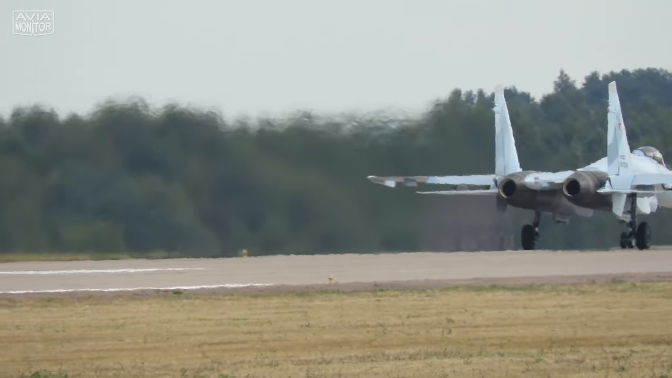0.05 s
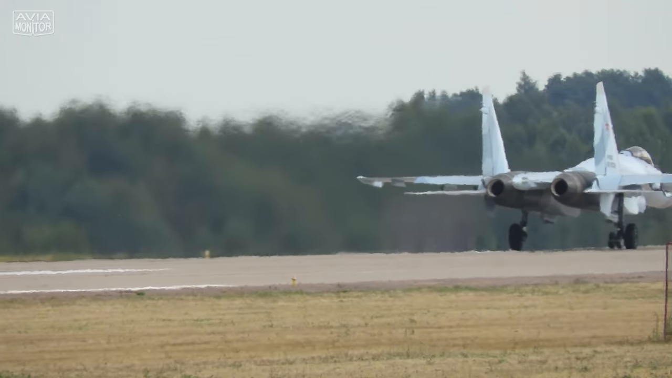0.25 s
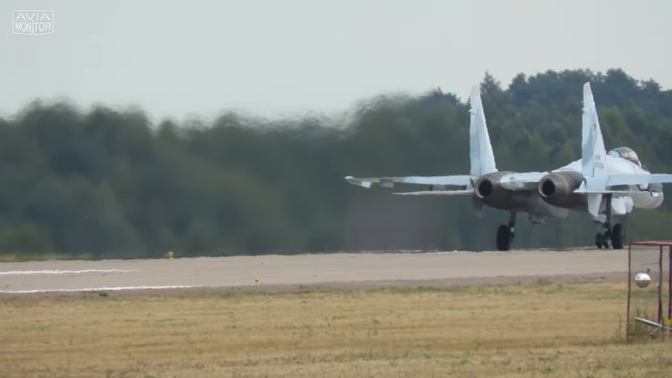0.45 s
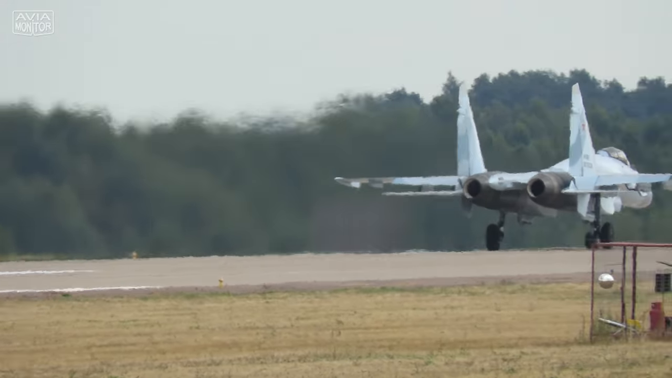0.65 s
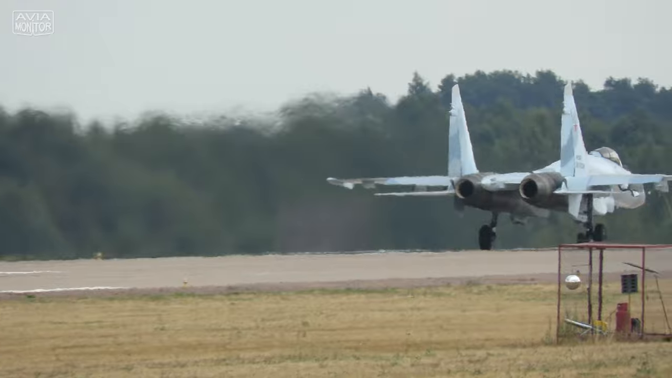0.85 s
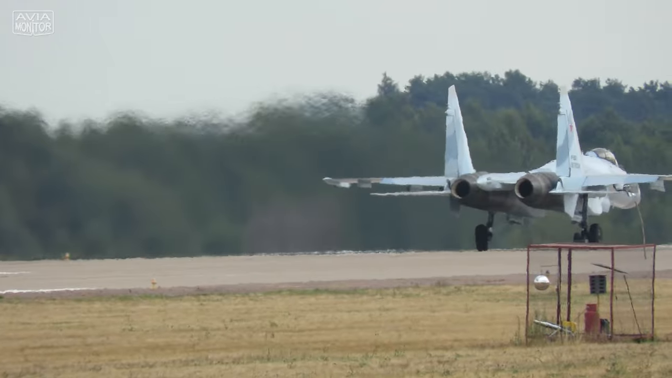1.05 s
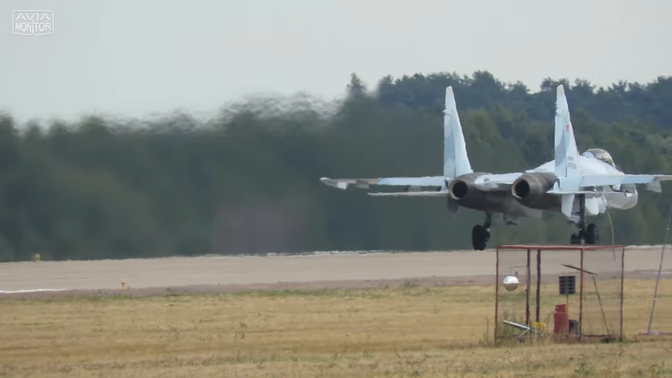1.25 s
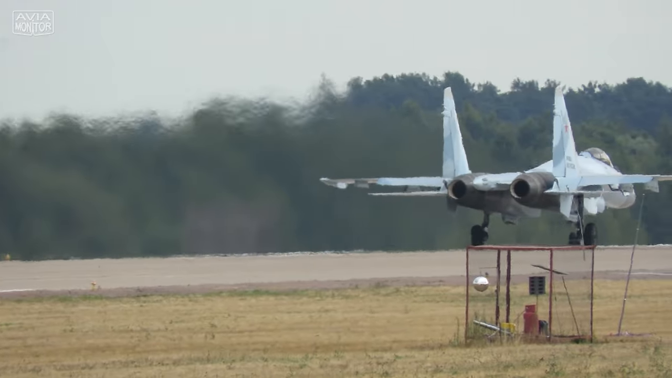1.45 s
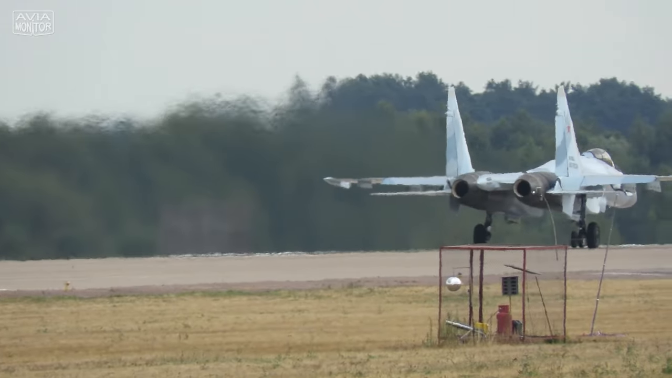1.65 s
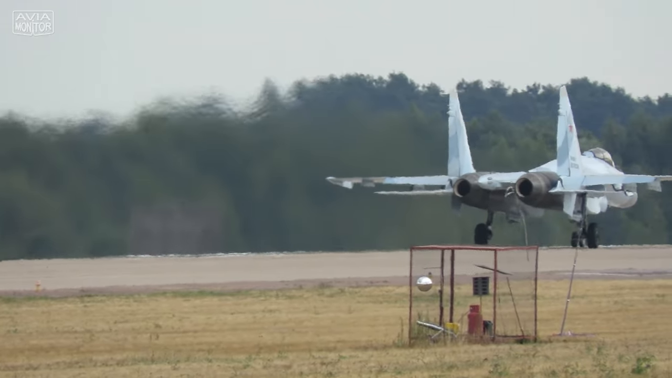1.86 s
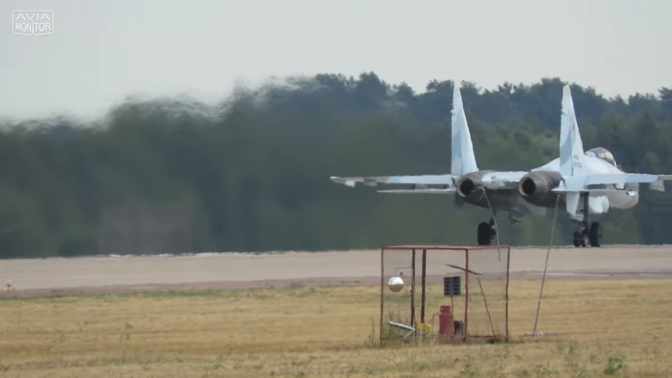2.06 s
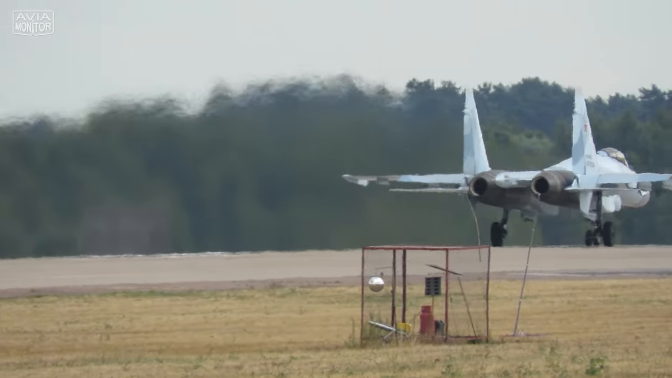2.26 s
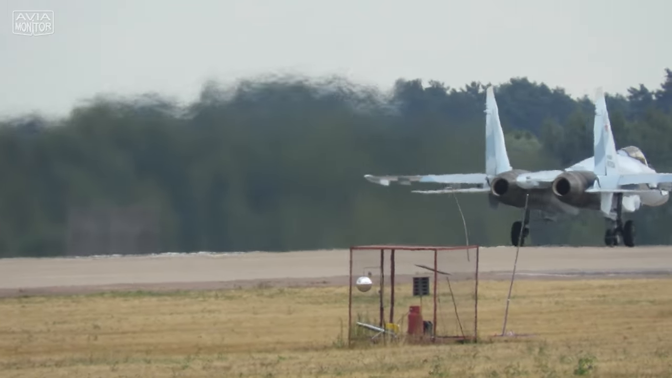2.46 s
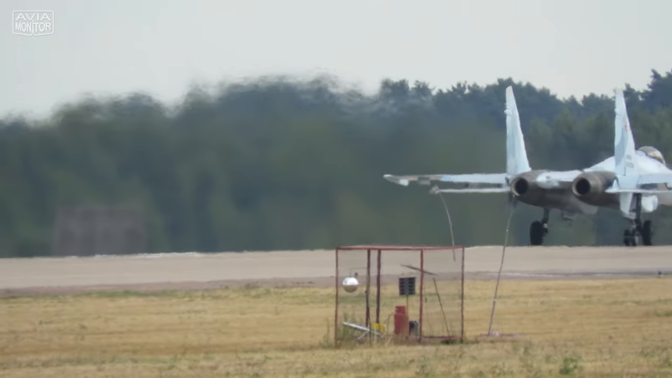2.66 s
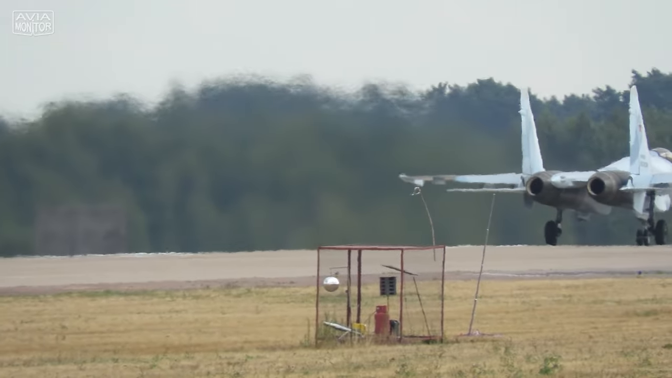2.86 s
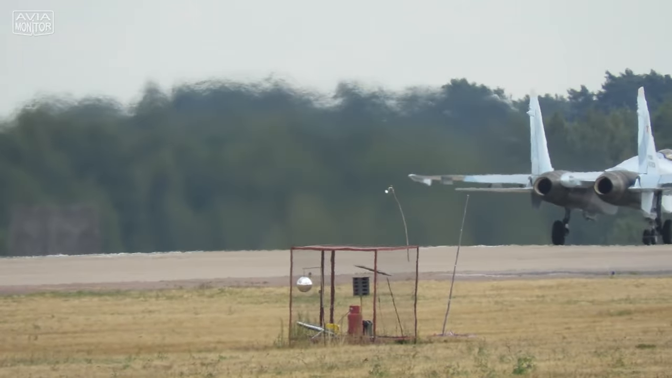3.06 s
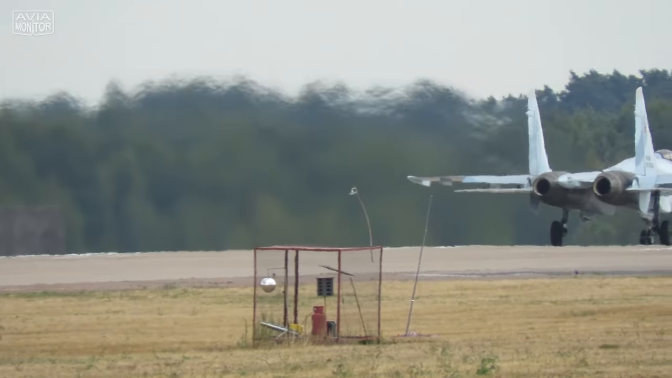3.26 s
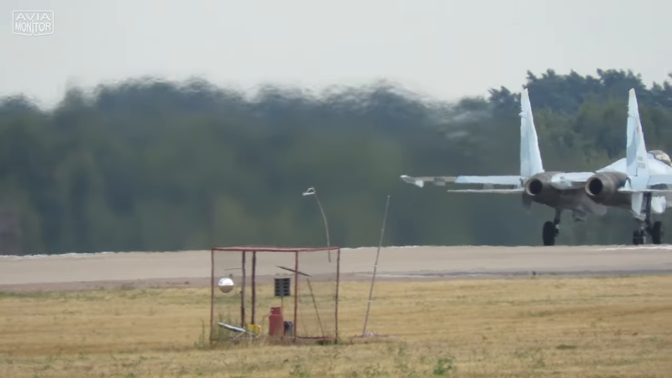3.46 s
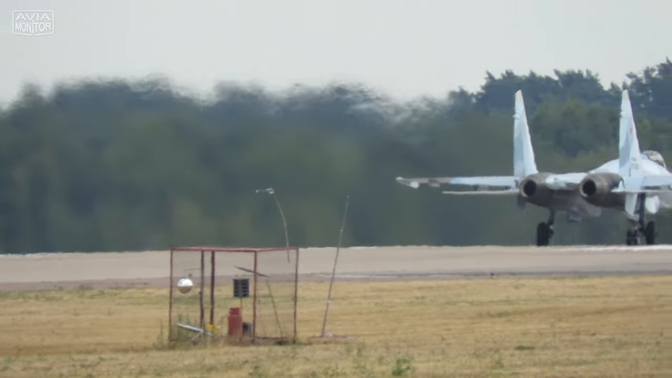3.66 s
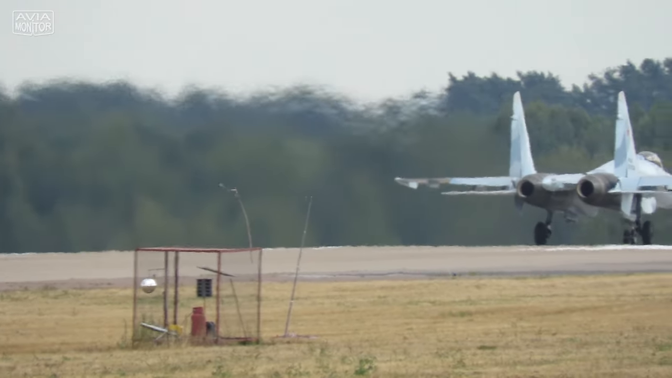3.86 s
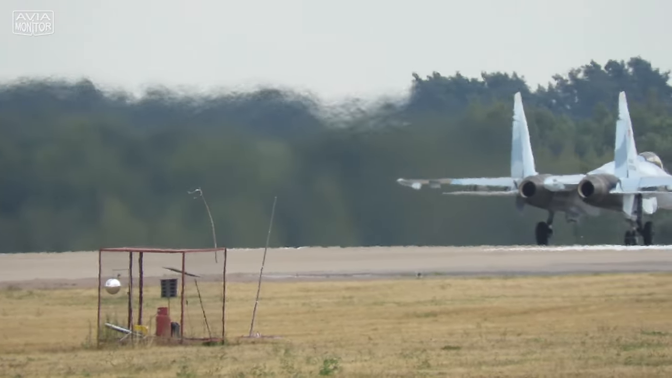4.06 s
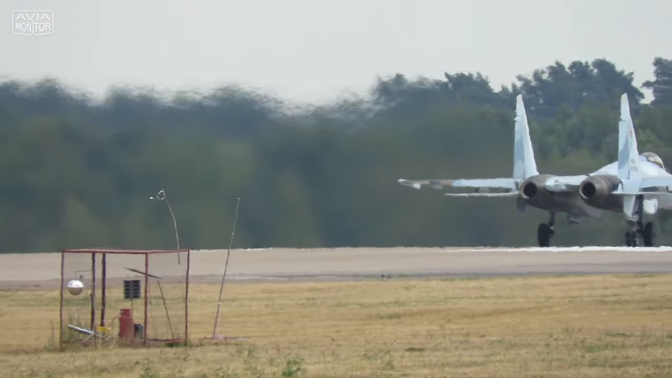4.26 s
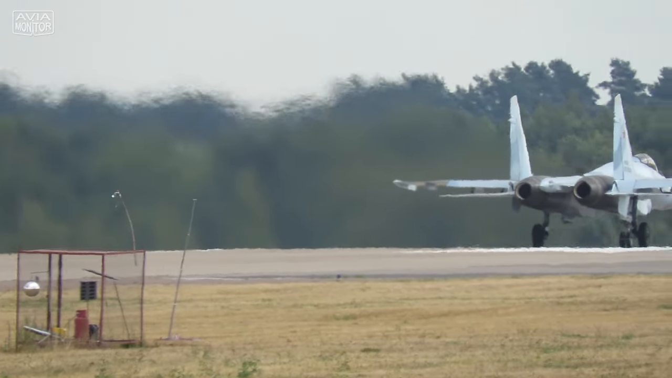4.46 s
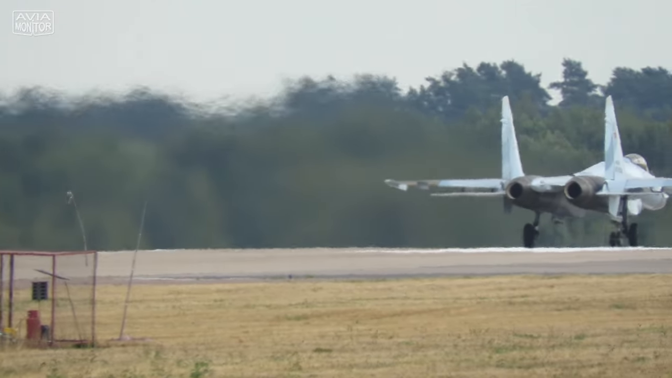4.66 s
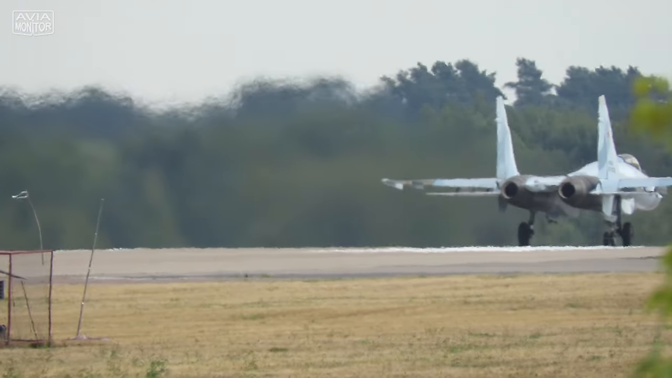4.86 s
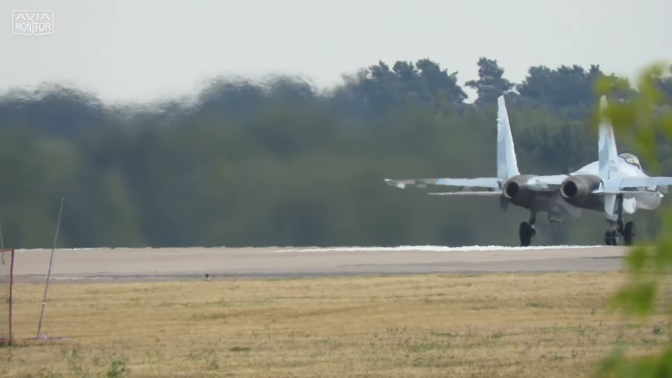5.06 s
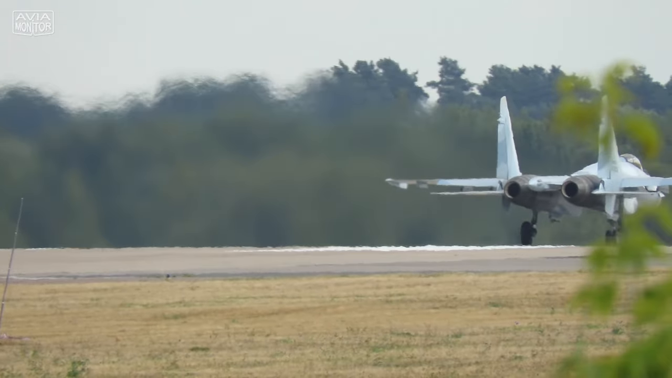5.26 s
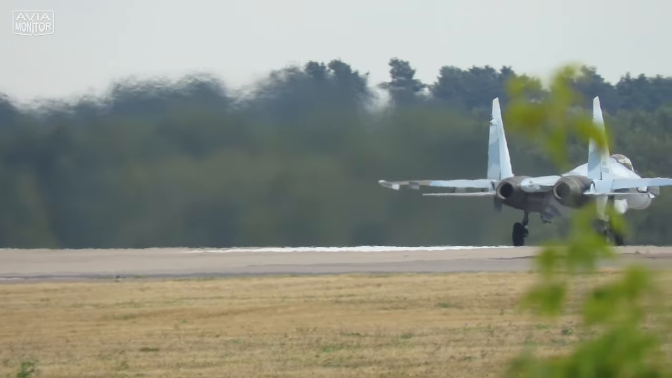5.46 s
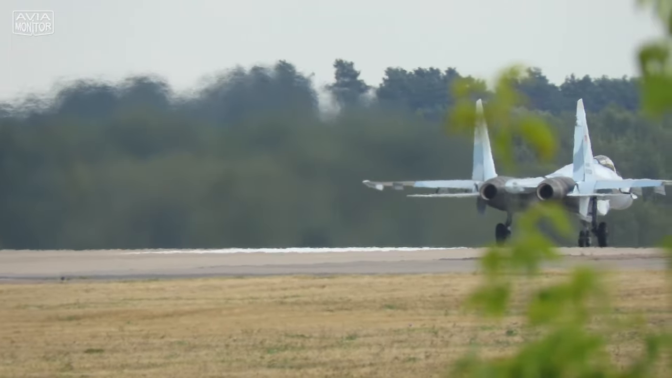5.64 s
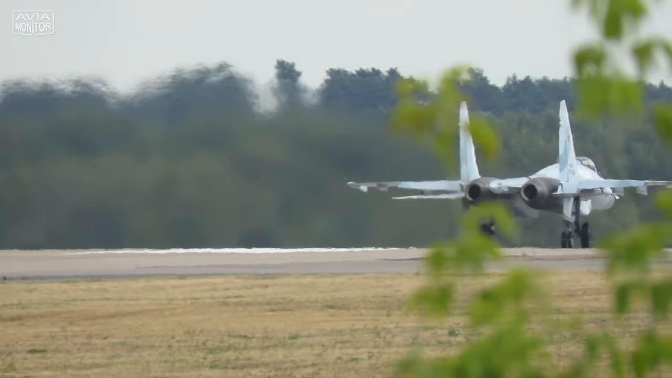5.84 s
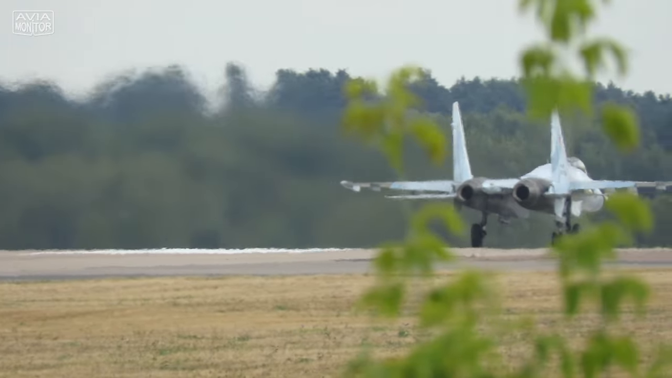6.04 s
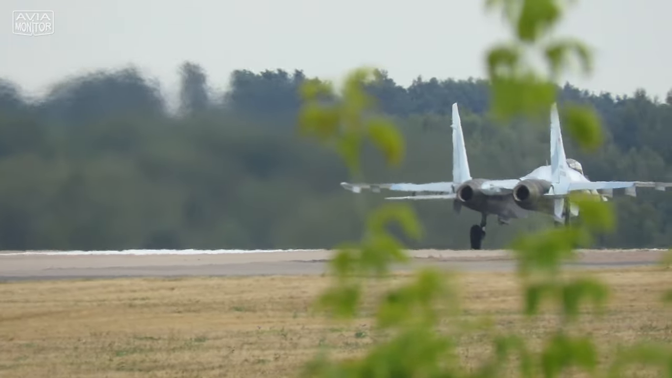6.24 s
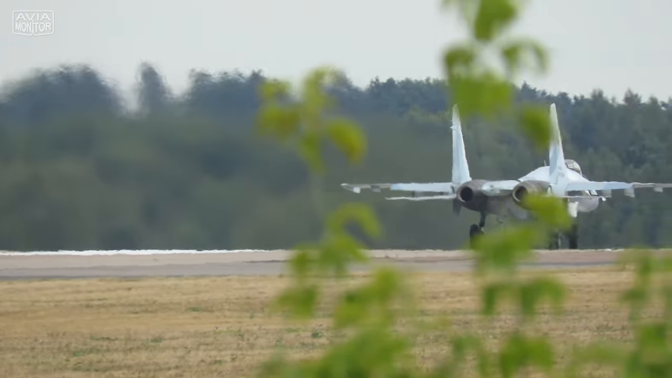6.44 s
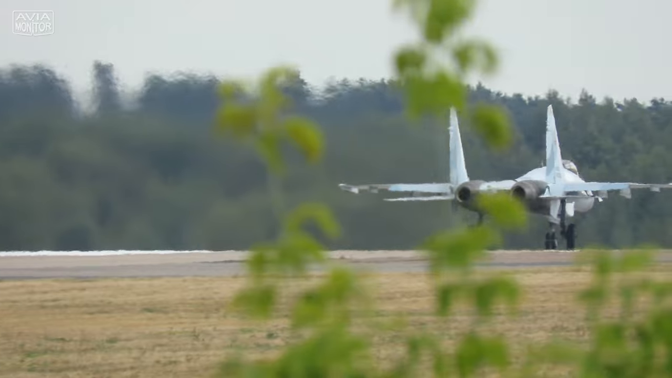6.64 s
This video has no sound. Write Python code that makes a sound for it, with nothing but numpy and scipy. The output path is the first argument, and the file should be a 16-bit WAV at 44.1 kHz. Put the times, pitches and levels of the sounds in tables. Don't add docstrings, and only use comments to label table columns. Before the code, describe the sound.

Steady camera hiss and a soft muffled turbine hush come first. Then the jet's throttles open: low rumble swells in waves, quickly growing into a broad, bass-heavy roar by the middle. It holds loud while the plane rolls away down the runway, wind-shifted and gently flickering, with slightly more rough airy edge. Outdoors, distant, mono, with a barely perceptible thin high whine from the microphone.

```python
import sys
import numpy as np
from scipy import signal
from scipy.fft import rfft, irfft, next_fast_len
from scipy.io import wavfile
from scipy.ndimage import uniform_filter1d

SR = 44100
rng = np.random.default_rng(int(sys.argv[2]) if len(sys.argv) > 2 else 0)


def store_wav(level_fs):
    pcm = np.round(np.clip(np.atleast_2d(level_fs), -1, 1) * 32767)
    wavfile.write(sys.argv[1], SR, pcm.T.astype(np.int16))


def volts(x):
    e = np.asarray(x, float) / 20
    return 10 ** e


N = 295470
STEP = 147

# (time [s], thrust as roar level [dB], clearness of the air path at CLEAR_HZ [dB])
THRUST = [(0, -49, -6.5), (.8, -49.5, 0), (1.3, -47, 3.5), (1.85, -43, -3), (2.1, -36.5, -3),
          (2.35, -39.5, 2.5), (2.88, -33.5, -5), (3.02, -29, -2.5), (3.5, -20.5, -2), (3.8, -23, -3.5),
          (3.97, -20.5, -1), (4.301, -21.5, 2), (4.6, -16.5, -1.2), (4.95, -17.5, 0.3), (5.5, -17, 0.5),
          (6.05, -16.5, -0.5), (6.4, -16.5, -2), (6.7, -16, -1.8)]
FULL_THRUST_DB = -18
CLEAR_HZ = 3430
ROLL_S = 2.63

# (frequency [Hz], level [dB per Hz])
EXHAUST_COLOUR = [(12, -45), (22, -27.5), (40, -12.5), (68, -1), (100, -1), (156, -5), (250, 0), (420, -4),
                  (700, -9), (1100, -14), (1900, -24.5), (2600, -33), (3350, -42.5), (5000, -70.5)]
EXHAUST_DB = -15.5

# (centre [Hz], share of the thrust swing [ratio], smoothing [s], offset [dB],
# drift while rolling [dB/s])
EDDIES = [
    (75, 0.75, 0.57, 4.5, -1.9),
    (260, 0.94, .05, -1.23, 0.13),
    (880, 0.68, 0.2, -5.5, 2),
    (3450, 0.21, .11, -7, 2.5),
]

# (time [s], centre [Hz], length [s], gain [dB])
SURGES = [(.2, 4240, .4, -18), (.4, 80, 0.57, -9), (.9, 1850, 0.36, 1.5), (1.15, 80, .12, -5),
          (1.6, 4200, 0.75, -8), (1.65, 160, 0.24, -4), (1.748, 80, 0.12, 6), (2.15, 160, 0.32, 4),
          (2.25, 2820, .22, 4), (2.55, 161, 0.14, 7), (2.603, 80, 0.31, -9), (2.7, 330, .3, -2.5),
          (2.857, 4200, .4, 9), (2.95, 3020, .25, 1.5), (3.045, 400, 0.16, 3.5), (3.444, 410, 0.15, 4),
          (3.444, 159, .25, 7), (3.7, 80, 0.3, -8), (3.7, 700, 0.18, -4.5), (3.903, 250, 0.11, 5),
          (3.971, 690, 0.13, -1), (4.0, 170, 0.14, 4), (4.154, 378, 0.22, 0), (4.144, 150, .2, 3),
          (4.265, 333, .1, 6), (4.302, 5270, .2, 2), (4.403, 80, 0.16, 4.5), (4.396, 790, 0.23, -1),
          (4.642, 400, 0.13, 3.5), (4.7, 205, 0.6, -5), (4.9, 350, 0.29, 1), (4.957, 690, 0.29, -1.5),
          (5.198, 1850, 0.66, 1), (5.352, 160, 0.15, 2.5), (5.503, 684, 0.51, 2), (5.5, 4910, .5, 6),
          (5.698, 900, .05, -2), (5.648, 270, 0.15, -2), (5.832, 4450, .16, 5),
          (6.045, 272, 0.11, 6.5), (6.05, 705, 0.18, 1), (6.15, 4410, 0.28, 5), (6.198, 80, 0.11, -15),
          (6.244, 242, .14, 4), (6.55, 100, 0.35, -2.5), (6.59, 450, 0.12, -1.5),
          (.2, 3300, 0.54, 2), (.35, 72, 0.53, 5), (.3, 110, .2, -4), (.6, 300, .4, 2.5),
                  (.55, 640, 0.38, 3.5), (1.1, 48, .25, -9), (1.1, 850, 0.22, -4), (1.3, 180, 0.28, 3),
                  (1.5, 105, .25, -8), (1.95, 108, 0.46, -4), (1.9, 155, .25, 3.5), (2.1, 230, 0.5, -3.5),
                  (2.298, 640, .2, -3), (2.9, 105, .3, -4), (2.9, 2350, .3, 3), (3.0, 300, .2, -0.5),
                  (3.2, 3300, .5, 2.5), (3.304, 170, 0.33, -2.5), (3.9, 160, .2, -2.5), (4.2, 390, .25, 4),
                  (4.3, 115, .25, 4.5), (4.303, 230, 0.18, 4.5), (4.7, 520, 0.38, -2), (4.8, 48, .7, -7),
                  (4.75, 4200, .5, 1.5), (4.994, 230, 0.42, -3), (5.1, 3200, .2, -2), (5.3, 4400, 0.35, 1),
                  (5.503, 225, 0.24, 1.5), (5.5, 108, 0.18, 2), (5.7, 72, 0.18, 2.5), (5.9, 2000, .3, -2.5),
                  (5.9, 780, .25, -3.5), (5.9, 48, .3, -2), (6.1, 160, 0.22, -6), (6.2, 950, 0.65, -2),
                  (6.4, 72, 0.41, 7), (6.55, 580, .3, -3), (6.5, 2900, .3, -0.5)]
SURGE_OCTAVES = 0.29

# (frequency [Hz], level [dB per Hz])
IDLE_COLOUR = [(12, -56.5), (24, -19.5), (50, 2.5), (95, -6.5), (170, -7.5), (300, -11), (600, -6.5),
               (1100, -7.5), (1720, -16), (2100, -21), (2350, -39.5), (2950, -26), (3500, -33.5),
               (5500, -61)]
IDLE_DB = -40.5

# (frequency [Hz], level [dB per Hz])
HISS_COLOUR = [(200, 5), (4000, -2.5), (6000, -4.5), (10000, -5.5), (13000, -6), (16000, -6.4),
               (20000, -10)]
HISS_DB = -57.5
# (time [s], length [s], gain [dB])
HISS_SWELLS = [
    (.6, 0.88, 0.3),
    (2.35, 0.32, 0.5),
    (3.1, .7, 0.2),
    (5.4, .4, 0.2),
    (5.85, .3, -.8),
]
# (frequency [Hz], level [dB rms])
CAMERA_TONE = [(13426.5, -81)]


def exhaust():
    t = times()
    s, thrust_db, clear_db = np.transpose(THRUST)
    swing_db = np.interp(t, s, thrust_db - FULL_THRUST_DB)
    clear = np.interp(t, s, clear_db)
    rolling = np.maximum(t - ROLL_S, 0)
    eddy_levels = []
    for _, share, smooth_s, offset_db, drift_db in EDDIES:
        window = max(int(smooth_s * SR / STEP), 1)
        smooth_swing = uniform_filter1d(swing_db, window, mode="nearest")
        eddy_levels.append(share * smooth_swing + offset_db + drift_db * rolling)
    eddy_levels = np.array(eddy_levels)
    eddy_octaves = np.log2(np.array(EDDIES)[:, 0])

    def bend_db(centre):
        weights = np.array([np.interp(centre, eddy_octaves, row) for row in np.eye(4)])
        return weights @ eddy_levels + clear * min(2 ** centre / CLEAR_HZ, 1.6)

    return swaying(EXHAUST_COLOUR, EXHAUST_DB, bend_db, sway_db=0.63, patchy_db=1.9, flicker_db=1.25)


def idle():
    return swaying(IDLE_COLOUR, IDLE_DB, lambda centre: 0, sway_db=-0.2, patchy_db=1.5, flicker_db=1.0)


def swaying(colour, level_db, bend_db, sway_db, patchy_db, flicker_db):
    spectrum, octave = coloured(colour, level_db)
    out = 0
    sway = walk(6.0)
    for centre in np.arange(4, 13.1, .25):
        band = np.clip(1 - 4 * np.abs(octave - centre), 0, 1)
        sway = .9 * sway + .44 * walk(3)
        db = bend_db(centre) + surge_db(centre) + sway_db * sway
        db = db + patchy_db * walk(5) + flicker_db * walk(14)
        out = out + irfft(spectrum * band)[:N] * audio_rate(volts(db))
    return out


def surge_db(centre):
    s, hz, length, db = np.transpose(SURGES)[:, :, None]
    pitch_distance = (np.log2(hz) - centre) / SURGE_OCTAVES
    time_distance = 2 * (times() - s) / length
    return (db * np.exp(-pitch_distance ** 2 - time_distance ** 2)).sum(axis=0)


def microphone_hiss():
    swell_db = sum(db * np.exp(-(2 * (times() - s) / length) ** 2) for s, length, db in HISS_SWELLS)
    breathing_db = .8 * walk(4.9) + .8 * walk(11) + swell_db
    return irfft(coloured(HISS_COLOUR, HISS_DB)[0])[:N] * audio_rate(volts(breathing_db))


def camera_tone():
    t = np.arange(N) / SR
    return sum(np.sqrt(2) * volts(db) * np.sin(2 * np.pi * hz * t) for hz, db in CAMERA_TONE)


def coloured(colour, level_db):
    size = next_fast_len(N)
    octave = np.log2(np.arange(size // 2 + 1) * SR / size + 1)
    hz, db = np.transpose(colour)
    gain = volts(np.interp(octave, np.log2(hz), db))
    gain = gain * volts(level_db) / np.sqrt(np.mean(gain ** 2))
    return rfft(rng.standard_normal(size)) * gain, octave


def walk(rate):
    size = len(times())
    hold = max(int(SR / STEP / rate), 1)
    held = np.repeat(rng.standard_normal(size)[:size // hold + 1], hold)
    smooth = uniform_filter1d(uniform_filter1d(held, hold), hold)
    return 0.61 * smooth[:size]


def times():
    return np.arange(N // STEP + 2) * STEP / SR


def audio_rate(control):
    return np.interp(np.arange(N) / SR, times(), control)


def scene():
    return (exhaust() + idle())[None]


def band_limit(x):
    return signal.sosfilt(signal.butter(12, 15800, fs=SR, output="sos"), x)


def record(dry):
    stop = np.clip(.45 + (N - np.arange(N)) / (.004 * SR), 0, 1)
    mix = dry * stop + microphone_hiss() + camera_tone()
    return band_limit(mix)


dry = scene()
out = record(dry)
store_wav(out)
```